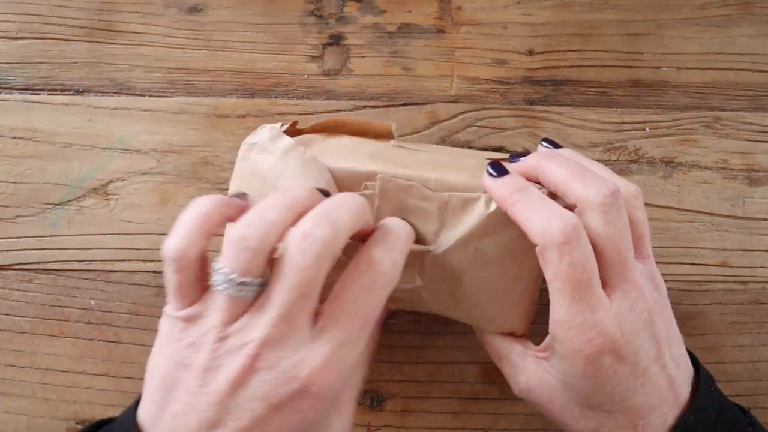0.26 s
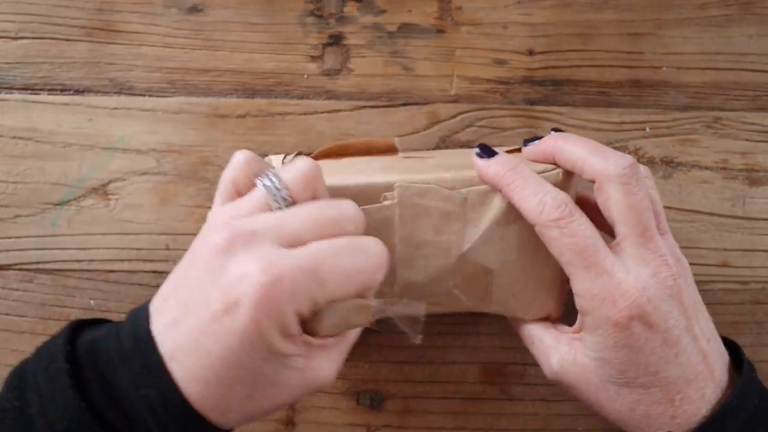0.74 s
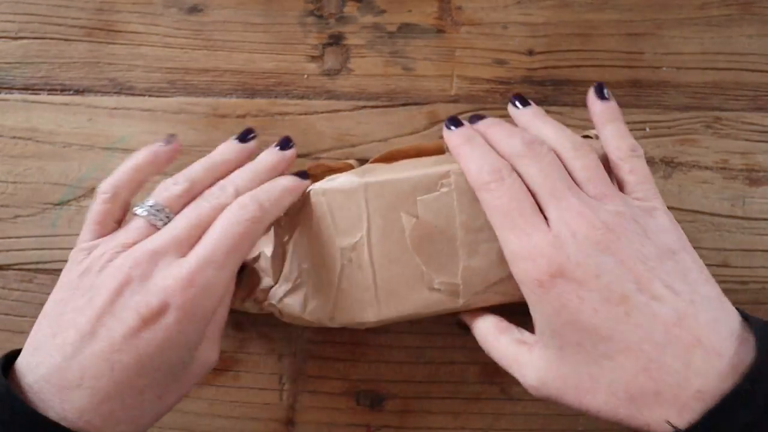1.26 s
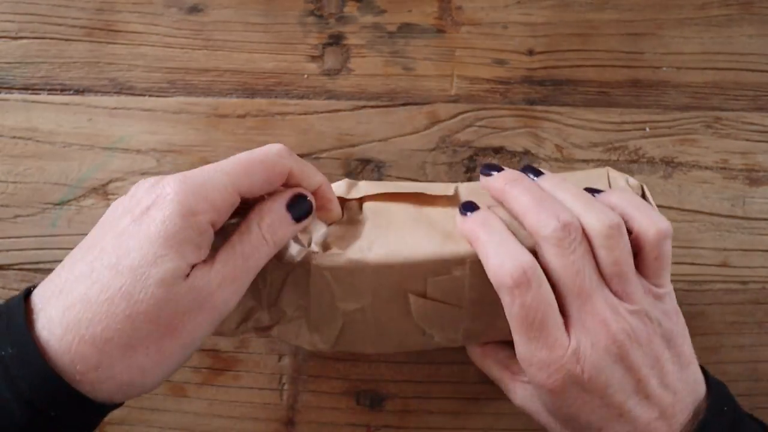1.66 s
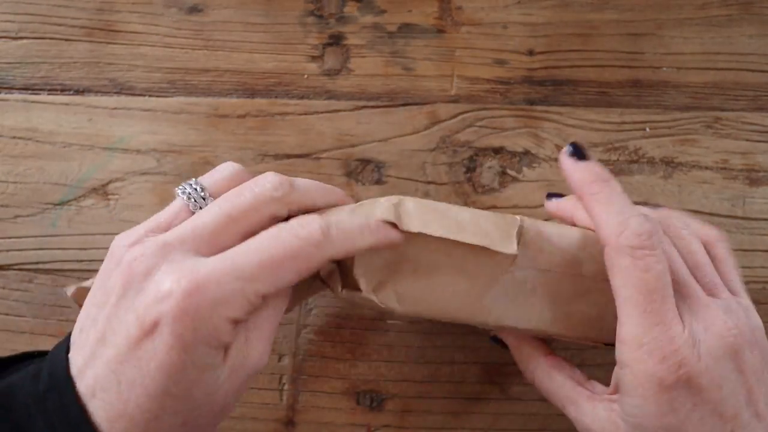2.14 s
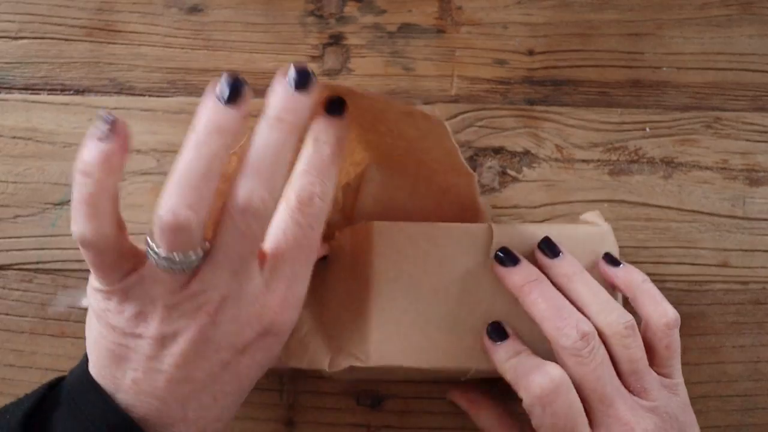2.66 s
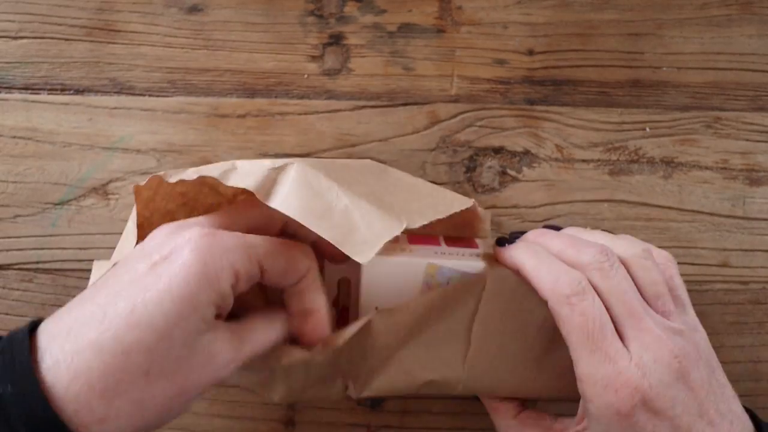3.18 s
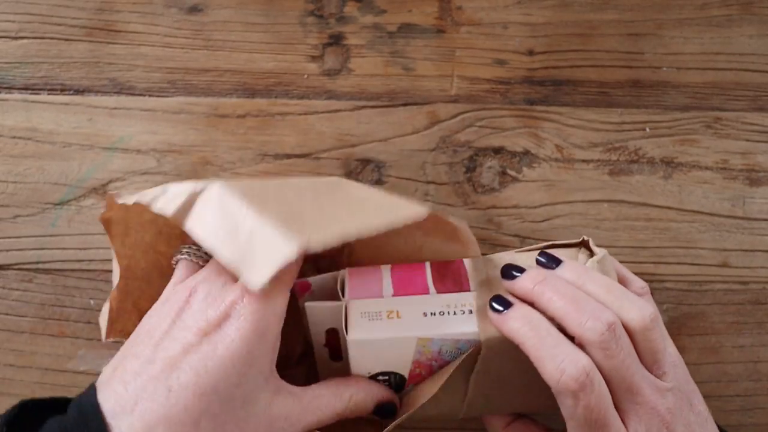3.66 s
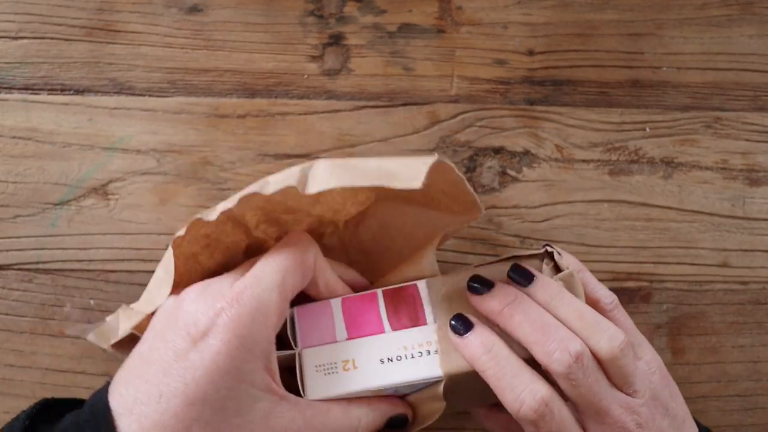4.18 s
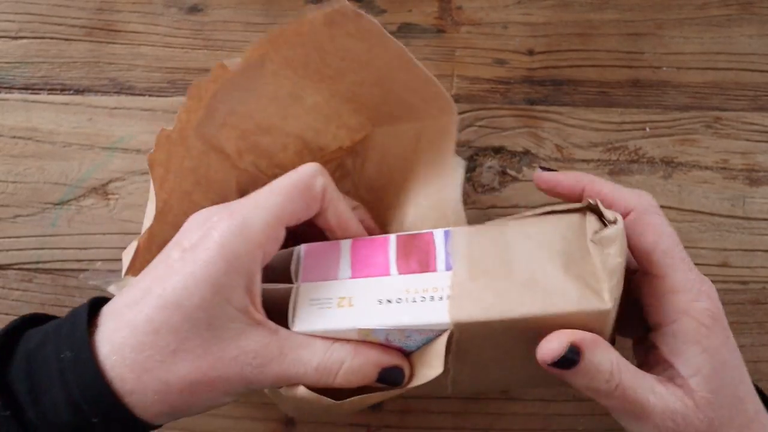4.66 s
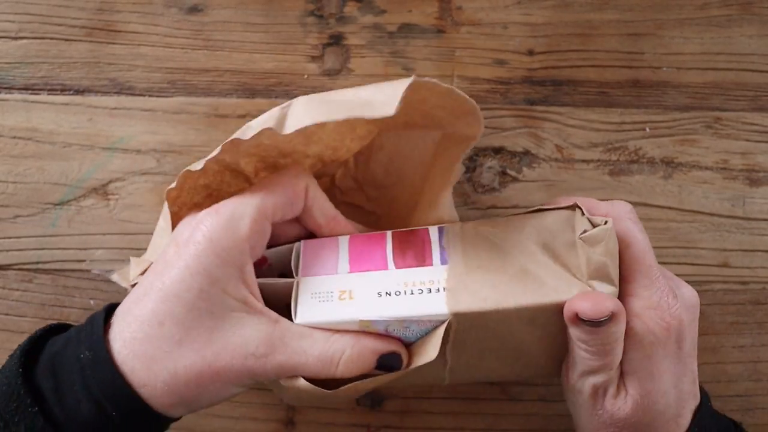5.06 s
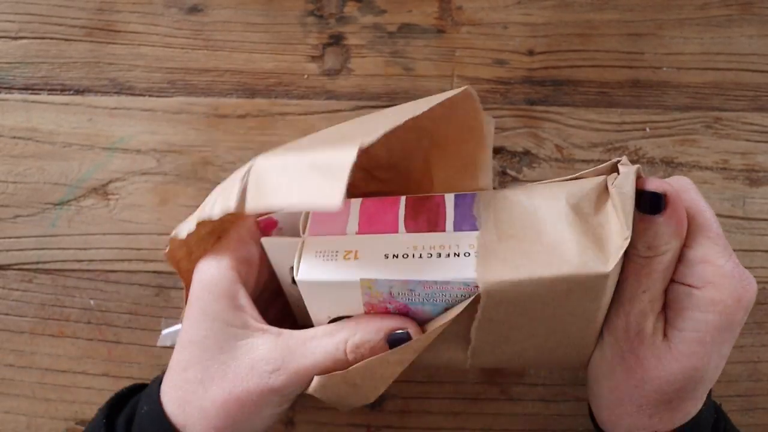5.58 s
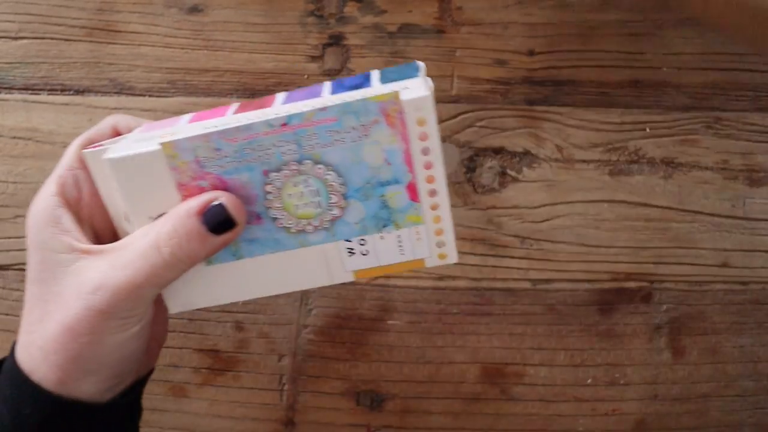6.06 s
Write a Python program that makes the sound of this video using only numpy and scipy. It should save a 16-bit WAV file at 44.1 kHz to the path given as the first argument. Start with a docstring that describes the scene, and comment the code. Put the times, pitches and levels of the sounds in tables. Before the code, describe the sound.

Close-up stereo sound of a stiff paper wrapper being handled: sharp snaps, dense crinkles and papery scraping, with muffled low knocks as the parcel shifts on the table. The crumpling comes in similar bouts separated by short near-silences, then gets continuous and busier towards the end. Small quiet indoor room, hardly any reverberation.

```python
"""Paper mailer crumpled on a table

Hands work a kraft-paper mailer open on a wooden table, close to a stereo microphone in a quiet room.
Creases are noise bursts through the bag's response, sliding paper is random ticks over hiss, and the
parcel bumps the table as short sine knocks over a low rumble. One handful of this is laid down five times:
the first is cut to its tail, the last ones overlap.
"""
import sys
import numpy as np
from scipy import signal
from scipy.fft import rfft, irfft
from scipy.io import wavfile
from scipy.ndimage import uniform_filter1d

SR = 44100
rng = np.random.default_rng(int(sys.argv[2]) if len(sys.argv) > 2 else 0)


def to_wav(s):
    """Save 16-bit WAV."""
    ch = np.atleast_2d(s).T  # columns
    pcm = np.round(np.clip(ch, -1, 1) * 32767)  # PCM
    wavfile.write(sys.argv[1], SR, pcm.astype(np.int16))


N = 278712

HANDFUL_S = 2.5
SIZE = int(HANDFUL_S * SR)
TIME = np.arange(SIZE) / SR
# the hands take hold and let go
GRASP_S, GRASP_RISE_S, LET_GO_S, LET_GO_FALL_S = .604, 0.0076, 2.11, 0.028


def undb(db):
    """Decibels to gain."""
    return 10 ** (np.asarray(db) / 20)


def unit(x):
    """Scale to rms 1."""
    return x / np.sqrt(np.mean(x ** 2))


def noise(size):
    """White noise."""
    return rng.standard_normal(size)


def convolve(x, response):
    """Pass x through an impulse response, keeping its length."""
    return signal.fftconvolve(x, response)[:len(x)]


def colour(points, size=2048):
    """Causal minimum-phase impulse response of a (Hz, dB) spectrum, by folding its cepstrum."""
    hz, db = np.transpose(points)
    bin_hz = np.arange(size // 2 + 1) * SR / size
    gain = undb(np.interp(np.log(bin_hz + 1), np.log(hz), db))
    cepstrum = irfft(np.log(gain))
    cepstrum[1:size // 2] *= 2
    cepstrum[size // 2 + 1:] = 0
    return irfft(np.exp(rfft(cepstrum)))


def resonate(x, hz, width_hz):
    """One resonance, gain 1 at its centre."""
    return signal.lfilter(*signal.iirpeak(hz, hz / width_hz, fs=SR), x)


def band(x, edges_hz, order=3):
    """Band-pass between two frequencies."""
    return signal.sosfilt(signal.butter(order, edges_hz, "band", fs=SR, output="sos"), x)


def walk(rate_hz):
    """Smooth random wander of rms 1."""
    hold = int(SR / rate_hz)
    steps = np.repeat(noise(SIZE // hold + 1), hold)
    return unit(uniform_filter1d(steps, hold)[:SIZE])


def swell(start_s, rise_s, end_s, fall_s, roundness=1.3):
    """Gain that rises to 1 at start_s, holds until end_s and dies away."""
    before, after = (start_s - TIME) / rise_s, (TIME - end_s) / fall_s
    return np.exp(-np.maximum(0, np.maximum(before, after)) ** roundness)


def quiet_room(level_db=-82):
    """Steady room tone: coloured noise, independent at each side."""
    # Each row: frequency in Hz, relative level in dB.
    room_tone = [(20, 12.5), (50, 8.5), (85, -4), (170, -4.5), (300, -20), (2000, -32), (16000, -33)]
    return undb(level_db) * np.array([unit(convolve(noise(N), colour(room_tone))) for _ in range(2)])


def table(push_db, rumble_db=-25, rumble_hz=170, rumble_tilt_hz=60, bump_db=-4, bump_cycles=0.33, apart_db=-3):
    """Dead bumps of the parcel and a rumble under the pressing hands, somewhat different at each side."""
    # Knocks through the box. Each row: start in seconds, envelope peak in dB before bump_db, pitch in Hz.
    knocks = [(0.6, -40.5, 80), (0.643, -41, 90), (0.658, -37.5, 75), (0.676, -43, 110), (0.698, -37, 194),
              (.792, -45, 75.2), (.814, -39.5, 70), (0.875, -48, 205), (.935, -36.5, 100),
              (.959, -39.5, 90), (.989, -39, 65), (1.333, -41, 70), (1.401, -34, 100), (1.424, -34, 80),
              (1.653, -33.5, 190), (1.845, -36, 193)]
    bumps = np.zeros(SIZE)
    for s, db, hz in knocks:
        start = int(s * SR)
        cycles = hz * TIME[:SIZE - start]
        envelope = (cycles / bump_cycles) * np.exp(1 - cycles / bump_cycles)
        bumps[start:] += undb(db + bump_db) * np.sin(2 * np.pi * cycles) * envelope
    press = undb(rumble_db + push_db)
    boards = colour([(8, -15), (22, 0), (rumble_tilt_hz, -1), (rumble_hz, -6), (2 * rumble_hz, -18), (1000, -50)])
    shared, left, right = (press * unit(convolve(noise(SIZE), boards)) for _ in range(3))
    return bumps + shared + undb(apart_db) * np.array([left, right])


def hands(hold_db=-48):
    """Level, body, crackle and pressure (dB): strokes swell over a light rub; the grip passes from one to the next."""
    # Strokes that slide paper on paper. Each row: peak time in seconds, level in dB, rise in seconds,
    # fall in seconds, body and crackle in dB against that level, pressure on the parcel in dB.
    strokes = [(.607, -38, 0.0044, 0.033, -3, -17, 15.5), (.684, -26.5, 0.028, 0.017, -11.5, -12, 10),
               (.757, -50, 0.0067, 0.028, 3.5, 0, 7), (0.814, -33, 0.0093, 0.03, -8.5, -9.5, 9),
               (.922, -33.5, 0.045, 0.044, -5.5, -20.5, 4.5), (.97, -37.5, 0.025, 0.025, -7, -7, 3.5),
               (1.088, -27.5, 0.029, 0.056, -12, -7.5, 5.5), (1.212, -30, 0.014, .05, -5.5, -7.5, 3),
               (1.297, -27, .04, 0.073, -11.5, -12, -0.5), (1.428, -29.5, 0.043, 0.033, -5, -7.5, 5),
               (1.52, -35.5, .05, 0.11, -6, -12, -10.5), (1.661, -29, 0.042, .03, -9.5, -9, -1),
               (1.818, -33, 0.031, 0.043, -9.5, -10, -1), (1.975, -34, .05, 0.043, -13, -11.5, -13),
               (2.04, -36, 0.011, 0.01, -11, -6, -11.5)]
    power = undb(hold_db) ** 2
    for s, db, rise_s, fall_s, *_ in strokes:
        power = power + (undb(db) * swell(s, rise_s, s, fall_s)) ** 2
    contact = swell(GRASP_S, GRASP_RISE_S, LET_GO_S, LET_GO_FALL_S)
    level_db = 10 * np.log10(power * contact ** 2 + 1e-14)
    peak_s, _, _, _, *grip = np.transpose(strokes)
    body_db, crackle_db, pressure_db = (np.interp(TIME, peak_s, column) for column in grip)
    return level_db, body_db, crackle_db, pressure_db


def paper_responses():
    """How the bag answers a tick: sheet colour plus hollow resonances, split in body, facet and crackle ranges."""
    # Colour of the paper. Each row: frequency in Hz, relative level in dB.
    paper_colour = [(100, -10), (200, -12.5), (330, -9), (420, -8.5), (500, -3.5), (1000, -3), (1600, 2),
                    (3100, 3), (5000, -3), (7300, -5), (9300, -9.5), (11000, -8.5), (13500, -16),
                    (16000, -23.5)]
    # Resonances of the bag round the box. Each row: centre in Hz, width in Hz, gain in dB.
    hollow = [(513, 24, -25.5), (661, 97, -9.5), (878, 110, -11.5), (1263, 220, -11.5), (1550, 76, -6),
              (2020, 170, -7), (2643, 53, -7.5), (3270, 55, -36), (3560, 88, -19)]
    # Body (whole panels), facets, crackle (fibres). Each row: low edge in Hz, high edge in Hz.
    ranges = [(200, 1100), (1100, 5500), (5500, 19000)]
    sheet = colour(paper_colour)
    bag = sheet + sum(undb(db) * resonate(sheet, hz, width_hz) for hz, width_hz, db in hollow)
    return [band(bag, edges_hz) for edges_hz in ranges]


def slide(responses, level_db, body_db, crackle_db, tick_rate_hz=600, tick_s=.0006, tick_spread_db=0.5,
          hiss_db=-8, fibre_hiss_db=-2, flutter_db=1.5):
    """Sliding paper catches and lets go in tiny ticks over a soft hiss; panels flutter most, fibres hiss most evenly."""
    sizes = undb(tick_spread_db * np.minimum(rng.exponential(size=SIZE), 3.5))
    ticks = (rng.random(SIZE) < tick_rate_hz / SR) * sizes
    energy = signal.lfilter([1], [1, -np.exp(-2 / (tick_s * SR))], ticks ** 2)
    grain, out = noise(SIZE), 0
    rel_dbs, even_dbs = (body_db, 0, crackle_db), (hiss_db, hiss_db, fibre_hiss_db)
    for response, rel_db, even_db, flutter in zip(responses, rel_dbs, even_dbs, (2, 1, .5)):
        friction = convolve(grain * np.sqrt(energy + undb(even_db) ** 2), response)
        gain = undb(level_db + rel_db + flutter * flutter_db * walk(70))
        out = out + gain * unit(friction)
    return out


def lesser_creases(level_db, count=14, rel_db=-1, spread_db=-0.7, ring_hz=2050, spread_octaves=0.3,
                   crackle_db=-18, rattle_s=0.002):
    """Small creases give way at random while the paper is held, their level following the stroke that bends them."""
    times_s = GRASP_S + (LET_GO_S - GRASP_S) * (np.arange(count) + rng.random(count)) / count
    rows = []
    for s, (loud, high) in zip(times_s, rng.standard_normal((count, 2))):
        db = np.interp(s, TIME, level_db) + rel_db + spread_db * loud
        rows.append((s, db, ring_hz * 2 ** (spread_octaves * high), crackle_db, rattle_s))
    return rows


def crease_body(ring_hz, pressure_db, facet_body_db=-12.5, db_per_octave=13.5, facet_hz=2110, db_per_pressure_db=0.41):
    """A large, low-ringing facet moves whole panels, the more so under a firm hand (dB)."""
    octaves_below = max(0, np.log2(facet_hz / ring_hz))
    return facet_body_db + db_per_octave * octaves_below + db_per_pressure_db * pressure_db


def creases(responses, level_db, pressure_db, snap_db=17.5, shiver_db=-21, shiver_s=.007, ring_db=7.5,
            ring_share=0.32, body_hang=1.53, crackle_hang=1.0, size=2048):
    """A facet snaps through, rattles while bending waves cross it, and leaves a short shiver in the sheet."""
    # Creases placed one by one, from sharp snaps to faint last ticks. Each row: start in seconds, level in dB,
    # facet ring in Hz, crackle in dB against that level, rattle time in seconds.
    placed_creases = [(.6771, -33.5, 2240, -13.5, 0.0046), (.686, -22.5, 2580, -27.5, 0.0013),
                      (0.6962, -21.5, 5430, -4.5, 0.0031), (.728, -27, 3400, -6.5, .0035),
                      (0.7504, -17.5, 2050, -13.5, 0.0016), (0.754, -21.5, 2500, -18, 0.0056),
                      (0.773, -25.5, 3270, 0.5, 0.0031), (.811, -30, 1320, -23, 0.0071),
                      (0.8516, -41, 700, -30, 0.0043), (.87, -45, 667, -16, 0.0032),
                      (0.8758, -19, 3430, -2.5, 0.0025), (0.896, -24.5, 2500, -4.5, 0.0023),
                      (.9101, -36.5, 870, -23, 0.0036), (0.9191, -17, 2860, -10, 0.0032),
                      (.959, -32.5, 1317, -11, 0.0047), (0.9856, -20.5, 2010, -3, 0.0019),
                      (1.0863, -20, 3000, -24, 0.0034), (1.102, -27.5, 1800, -2.5, .0027),
                      (1.1408, -27.5, 1800, -12, 0.0028), (1.1576, -24.5, 3340, -4, 0.0036),
                      (1.1853, -29.5, 2610, -3.5, 0.0035), (1.203, -21.5, 3020, -10, 0.0048),
                      (1.2065, -18, 3100, -7, .0036), (1.217, -24.5, 1510, -26, .003),
                      (1.2272, -25.5, 3534, 4.5, 0.0048), (1.25, -19.5, 1590, -8, 0.0018),
                      (1.2673, -20.5, 3080, -10, 0.0014), (1.2749, -21, 1500, -1.5, 0.0018),
                      (1.28, -30.5, 1720, -8, .0024), (1.293, -20.5, 4050, 0.5, 0.0042),
                      (1.3018, -33, 980, -22.5, .0033), (1.312, -25, 1470, -6.5, 0.0025),
                      (1.3204, -23.5, 3110, -5.5, 0.0012), (1.329, -24, 1260, -11, 0.003),
                      (1.339, -28.5, 1510, -6.5, .004), (1.3656, -24, 3220, 0.5, 0.0019),
                      (1.4166, -29, 3450, -1.5, 0.005), (1.4338, -24, 1710, -4.5, 0.0019),
                      (1.4614, -28, 1550, -6, .0024), (1.484, -32, 2090, -6, 0.0033),
                      (1.4939, -27.5, 2040, -8, 0.0019), (1.5221, -25, 1650, -7, .0024),
                      (1.534, -39.5, 2400, -2.5, 0.0022), (1.5973, -26.5, 1650, -7, 0.0032),
                      (1.621, -30, 1500, -15, 0.0017), (1.6511, -30.5, 956, -5.5, 0.0043),
                      (1.6667, -29, 1980, -5, 0.0022), (1.8099, -30, 1810, -14, 0.0069),
                      (1.821, -23.5, 1970, -11, 0.0031), (1.8462, -28.5, 2870, -6.5, 0.0043),
                      (1.9092, -28.5, 980, -7.5, 0.0011), (1.974, -39.5, 2040, -20, .002),
                      (1.9921, -26, 2250, -8, 0.006), (2.0894, -29.5, 3060, -9, 0.005),
                      (2.092, -29, 3300, -6, 0.0018), (2.135, -40.5, 3850, -7, 0.00069),
                      (2.1712, -63, 2010, -4, 0.0013), (2.273, -76, 3200, -12, 0.00081)]
    out, t = np.zeros(SIZE), np.arange(size) / SR
    attack = int(.004 * SR)
    for s, db, ring_hz, crackle_db, rattle_s in [*placed_creases, *lesser_creases(level_db)]:
        grain, start = noise(size), int(s * SR)
        body_db = crease_body(ring_hz, pressure_db[start])
        # big panels ring on longer than fibres
        for response, rel_db, hang in zip(responses, (body_db, 0, crackle_db), (body_hang, 1, crackle_hang)):
            rattle = np.exp(-(t / (rattle_s * hang)) ** 2)
            shiver = undb(shiver_db) * np.exp(-t / (shiver_s * hang ** 2))
            push = grain * (rattle + shiver)
            push[0] = undb(snap_db)
            push = push + undb(ring_db) * resonate(push, ring_hz, ring_share * ring_hz)
            snap = convolve(push, response)
            attack_rms = np.sqrt(np.mean(snap[:attack] ** 2))
            out[start:start + size] += undb(db + rel_db) * snap / attack_rms
    return out


def backed(x, pressure_db, deep_hz=470, db_per_pressure_db=0.7):
    """Paper held against the box sounds full; a loose flap is too small to radiate the deep part."""
    deep = signal.sosfiltfilt(signal.butter(3, deep_hz, fs=SR, output="sos"), x)
    return x + (undb(db_per_pressure_db * pressure_db) - 1) * deep


def microphones(x, lag_s=.000028, left_db=1.5, beam_db=-8, beam_hz=3000, room_db=-19, room_t60_s=.14,
                wall_s=0.0048, size=8192):
    """The paper is a little louder on the left and earlier on the right; brief, diffuse reflections follow."""
    hz = np.arange(SIZE // 2 + 1) * SR / SIZE
    left = irfft(rfft(x) * np.exp(-2j * np.pi * hz * lag_s), SIZE)
    direct = np.array([left * undb(left_db / 2), x * undb(-left_db / 2)])
    # every facet beams its treble its own way, so each side gets it with its own strength and phase
    high_pass = signal.butter(1, beam_hz, "high", fs=SR, output="sos")
    treble = signal.hilbert(signal.sosfilt(high_pass, direct))
    beams = np.array([walk(500) + 1j * walk(500) for _ in range(2)]) / np.sqrt(2)
    t = np.arange(size) / SR
    fade = undb(-60 * t / room_t60_s) * (t > wall_s)
    fade = fade / np.sqrt(np.sum(fade ** 2))
    room = np.array([convolve(x, noise(size) * fade) for _ in range(2)])
    return direct + undb(beam_db) * np.real(treble * beams) + undb(room_db) * room


def scene(table_left_db=-2.0):
    """The handful of crumpling, laid down five times over the room tone."""
    # Each entry: shift of the handful's times in seconds.
    repeat_shifts_s = [-1.76, 0, 1.76, 3.28, 4.16]
    responses = paper_responses()
    level_db, body_db, crackle_db, pressure_db = hands()
    snaps = creases(responses, level_db, pressure_db)
    sliding = slide(responses, level_db, body_db, crackle_db)
    paper = microphones(backed(snaps + sliding, pressure_db))
    table_balance = undb([[table_left_db / 2], [-table_left_db / 2]])
    handful = paper + table(level_db + pressure_db) * table_balance
    out = quiet_room()
    for shift_s in repeat_shifts_s:
        at = np.arange(SIZE) + round(shift_s * SR)
        inside = (at >= 0) & (at < N)
        out[:, at[inside]] += handful[:, inside]
    return out


def record(dry, top_hz=16200):
    """A steep elliptic low-pass cuts the top."""
    return signal.sosfilt(signal.ellip(10, .2, 80, top_hz, fs=SR, output="sos"), dry)


dry = scene()
out = record(dry)
to_wav(out)
```